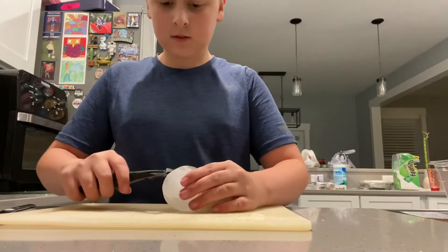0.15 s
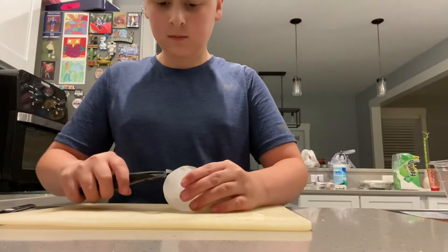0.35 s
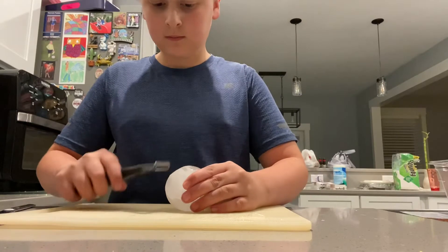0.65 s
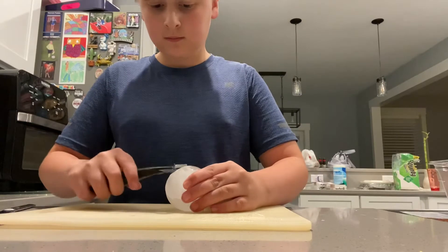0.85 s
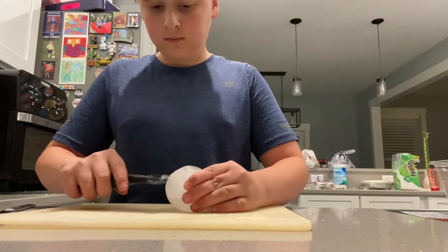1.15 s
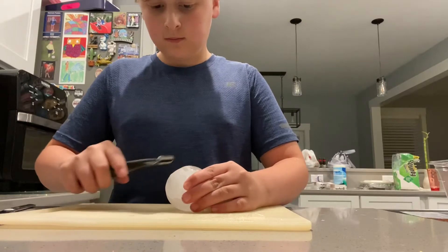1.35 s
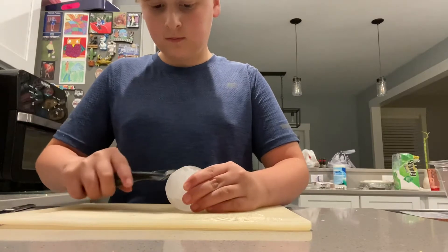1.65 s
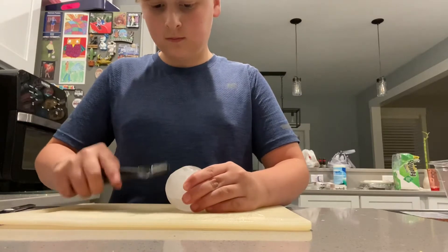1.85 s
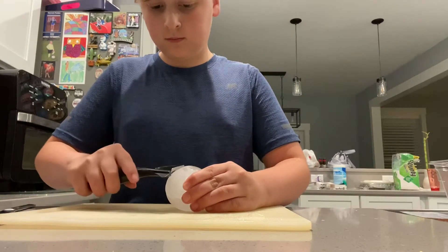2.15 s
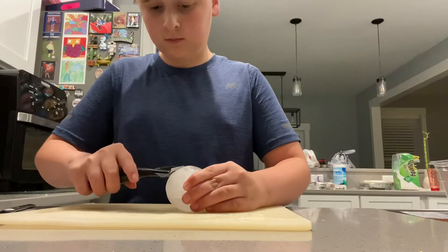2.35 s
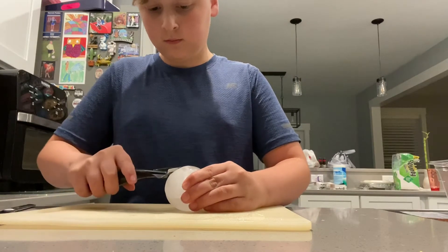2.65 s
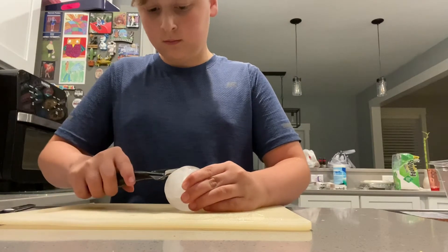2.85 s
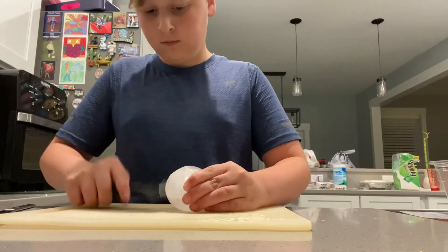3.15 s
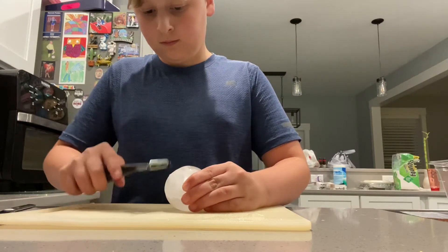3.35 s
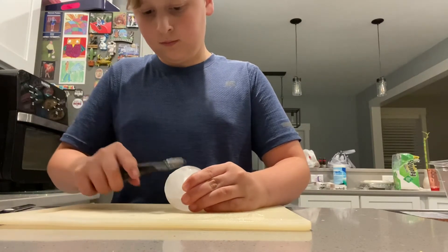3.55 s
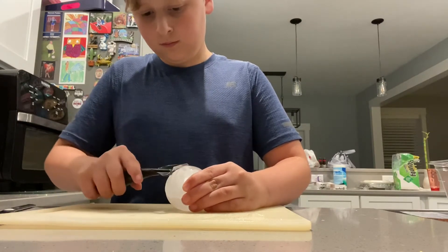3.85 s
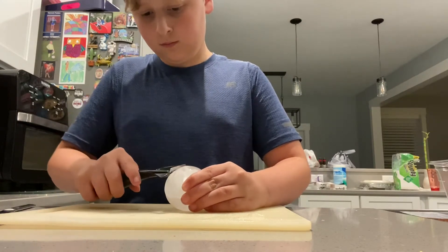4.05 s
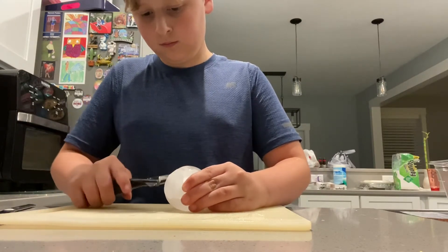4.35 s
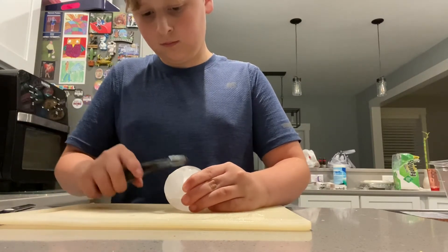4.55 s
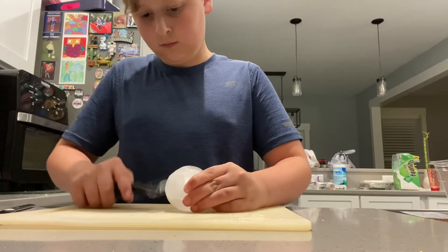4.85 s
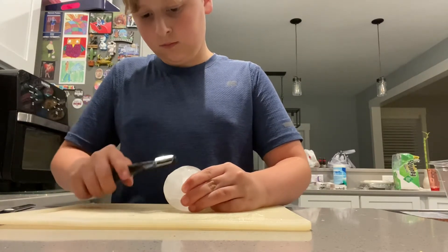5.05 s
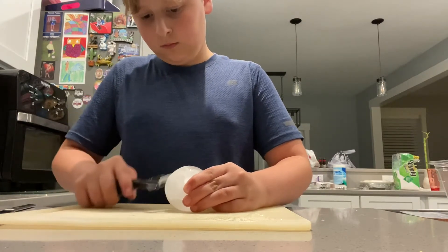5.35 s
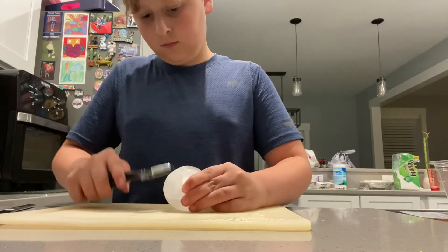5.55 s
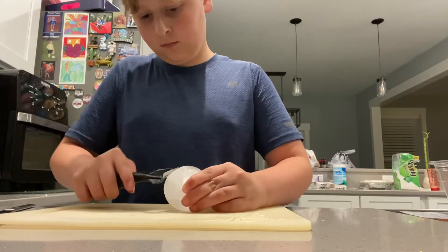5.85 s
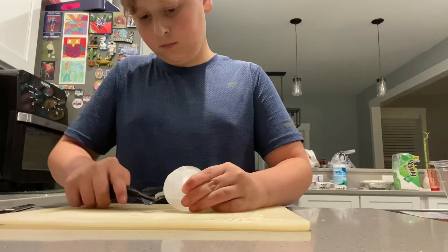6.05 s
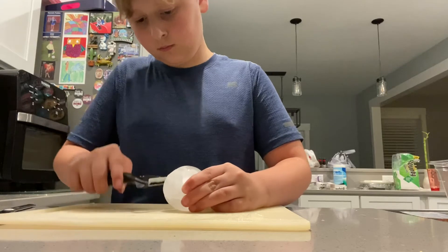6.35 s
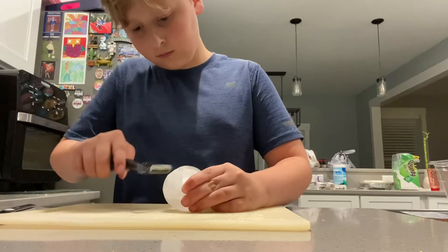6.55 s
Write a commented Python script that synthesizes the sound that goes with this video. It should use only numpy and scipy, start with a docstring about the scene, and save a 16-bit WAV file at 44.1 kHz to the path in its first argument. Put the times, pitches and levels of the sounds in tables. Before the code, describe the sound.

A steel peeler rasps in short, gritty strokes over a ball of ice, landing with sharp cracks and woody booms in a quiet kitchen.

```python
"""A quiet kitchen, close up on a phone's two microphone ports: a steel peeler shaves ice on a wooden board.
It opens with the blade already on the ice: fracture noise shakes the steel and the board booms under it.
Stroke follows stroke; the blade rattles, sings on one mode, and from the first second lands with a crack.
Knocks on the board follow, the heaviest just before six seconds, as the last stroke ends.
The room's decaying answer follows every sound; air noise, fuzzy tones and a low drone run throughout."""
import sys
import numpy as np
from scipy import signal
from scipy.fft import rfft, irfft, next_fast_len
from scipy.io import wavfile
from scipy.ndimage import uniform_filter1d, map_coordinates

SR = 44100
rng = np.random.default_rng(int(sys.argv[2]) if len(sys.argv) > 2 else 0)


def generate_wav(signal):
    """Clip the signal to [-1, 1] and save it as 16-bit WAV at the path in sys.argv[1]."""
    frames = np.transpose(np.atleast_2d(signal))
    scaled = np.clip(frames, -1, 1) * 32767
    pcm = np.round(scaled).astype(np.int16)
    wavfile.write(sys.argv[1], SR, pcm)


N = 295470  # samples

# the blade lands on the ice: (time [s], crack [dB], skid before it [s], skid [dB], board boom [dB],
# boom [Hz], low ring [dB], high ring [dB], settling [s]); the settling slope lasts half the last column
LANDINGS = [(0.823, -31, 0.016, -41.5, -17.5, 276, -46.5, -38, 0.21),
            (1.4552, -26, 0.013, -39.5, -17.5, 267, -40, -50, 0.21),
            (2.0106, -29, 0.01, -42, -15, 264, -46, -45.5, .24),
            (3.5586, -27.5, 0.013, -41, -22, 273, -51, -38.5, 0.65),
            (4.557, -21.5, 0.01, -39.5, -14, 282, -38, -24.5, 0.23),
            (5.132, -23.5, 0.0077, -39, -14.5, 278.5, -34, -34, 0.12),
            (5.6889, -33, 0.0075, -38.5, -18.5, 279, -51.5, -44, 0.48)]
# resonances of the steel peeler: (frequency [Hz], width [Hz], gain [dB])
PEELER = [(770, 4.3, -12.5), (1008, 74, -11), (1754, 68, -14), (2296, 28, -2.5), (2914, 110, -8),
          (3587, 55, -1.5), (4115, 210, -7.5), (4597, 38, -7), (4850, 33, -22), (6240, 1200, -13),
          (8000, 97, -26)]
# resonances of the wooden board: (frequency [Hz], width [Hz], gain [dB])
BOARD = [(154, 72.6, 1), (296.6, 42.6, 4), (479.8, 40.8, 0.5)]
# spectrum of a crack or clack: (frequency [Hz], level [dB per Hz])
CRACK = [(290, -30.5), (500, 3.5), (1450, 1), (3500, 0.5), (4220, -1.5), (5630, -1.5), (6690, 1.5),
         (9000, -7.5), (13000, -11), (15700, -32)]


def amp(db):
    """Decibels to linear gain."""
    return 10 ** (np.asarray(db) / 20)


def unit(x):
    """Scale to an RMS of one."""
    return x / np.sqrt(np.mean(x ** 2) + 1e-20)


def along(points, hz):
    """Interpolate (frequency, value) points on a log frequency axis."""
    f, v = np.transpose(points)
    return np.interp(np.log(hz + 1), np.log(f + 1), v)


def filtered(x, response):
    """Multiply the spectrum of x by a complex response of frequency."""
    m = next_fast_len(N + SR // 2)
    return irfft(rfft(x, m) * response(np.fft.rfftfreq(m, 1 / SR)), m)[..., :N]


def modes(table):
    """Causal response of (frequency, width, dB) resonances, with alternating polarity."""
    def response(f):
        total = 0
        for k, (centre, width, db) in enumerate(table):
            damping = 1j * f * width
            total = total + (-1) ** k * amp(db) * damping / (centre * centre - f * f + damping)
        return total
    return response


def colour(spectrum):
    """Zero-phase response of a smooth (frequency, dB) spectrum."""
    return lambda hz: amp(along(spectrum, hz))


def add(track, s, sound):
    """Mix a sound in at time s."""
    part = track[round(s * SR):][:len(sound)]
    part += sound[:len(part)]


def burst(db, t60, rise=.0001):
    """A puff of noise with a fast rise and an exponential decay."""
    t = np.arange(SR // 20) / SR
    return amp(db - 60 * t / t60) * (1 - np.exp(-t / rise)) * rng.standard_normal(len(t))


def push(db, length):
    """A soft raised-cosine shove."""
    return amp(db) * np.hanning(int(length * SR) + 3)


def wobble(rate):
    """A smooth random curve, rate knots a second."""
    return map_coordinates(rng.standard_normal(int(N * rate / SR) + 4), [np.arange(N) * rate / SR])


def contact():
    """Gains of rasp, treble, board and hollow body, all driven by the pressure of the blade."""
    # one curve per stroke or light touch, each a list of: (time [s], rasp level [dB])
    stroke_curves = [
        [(0.0, -55), (0.036, -54.5), (0.106, -60.5), (0.17, -71.5)],
        [(0.22, -90), (0.236, -74), (0.294, -75.5), (0.33, -67)],
        [(0.335, -64), (0.345, -54), (0.399, -50), (0.433, -47), (0.462, -66.5), (0.475, -55), (0.5, -59.5)],
        [(0.93, -69), (0.966, -49.5), (1.082, -50), (1.15, -55), (1.17, -89)],
        [(1.49, -59), (1.584, -45.5), (1.626, -52.5), (1.672, -42), (1.705, -59), (1.74, -60)],
        [(2.082, -69.5), (2.128, -49.5), (2.166, -59), (2.19, -75)],
        [(2.5, -78), (2.512, -76.5), (2.668, -80), (2.79, -71.5)],
        [(2.801, -45), (2.807, -53.5), (2.845, -41), (2.863, -55.5), (2.92, -63)],
        [(3.036, -52), (3.043, -46.5), (3.096, -42), (3.11, -49.5)],
        [(3.112, -52), (3.138, -40), (3.17, -54.5)],
        [(3.85, -87), (3.88, -77), (3.955, -85.5)],
        [(3.96, -80), (4.004, -57), (4.06, -45.5), (4.104, -51.5), (4.234, -45), (4.27, -72), (4.33, -59.5)],
        [(4.655, -58.5), (4.707, -47.5), (4.815, -38), (4.869, -59.5), (4.893, -54.5), (4.91, -53)],
        [(5.194, -64.5), (5.23, -49), (5.31, -42), (5.34, -38.5), (5.36, -56)],
        [(5.8, -70), (5.848, -43), (5.89, -40.5), (5.911, -39.5)],
        [(5.912, -30.5), (5.935, -38), (5.96, -46)],
    ]
    # colour of each stroke, same order, around its rasp: (treble [dB], board [dB], hollow body [dB])
    stroke_colours = [(-11.5, 0, -8), (-0.5, 6.5, 0.5), (-4.5, 3, -10), (-6, 1, -9.5), (-5.5, 1.5, -9),
                      (-6, -4, -8.5), (-5, 0.5, -4.5), (-3.5, 1, -3.5), (-3.5, 0, -2), (-3, 3.5, -5),
                      (3.5, 7.5, 2), (-5.5, 1, -4.5), (-5.5, 0.5, -5.5), (-6.5, -3, -9.5), (-2.5, -2, -4.5),
                      (0, 5.5, 6.5)]
    brighten_db = 2.5  # treble gain from start to end of a stroke
    firm_db = -53  # rasp level at which the board and body colours hold as listed
    board_follows, hollow_follows = 0.67, 0.68  # dB per dB of rasp
    # after a landing the blade settles: rasp under the crack's level [dB], delay [s], colour [dB]
    settle_db, settle_after_s, settle_colour = -28.5, 0.015, (-11.5, 3.9, -7)

    t, level = np.arange(N) / SR, np.zeros((4, N))
    contacts = list(zip(stroke_curves, stroke_colours))
    for s, crack_db, *_, settling_s in LANDINGS:
        start_s, start_db = s + settle_after_s, crack_db + settle_db
        curve = [(start_s, start_db), (start_s + settling_s / 2, start_db - 36.5)]
        contacts.append((curve, settle_colour))

    for curve, (treble_db, board_db, hollow_db) in contacts:
        s, db = np.transpose(curve)
        now = slice(max(int((s[0] - .01) * SR), 0), int((s[-1] + .01) * SR))
        edge_distance = np.minimum(t[now] - s[0], s[-1] - t[now])
        fade = np.clip(edge_distance / .004 + .5, 0, 1)
        rasp_db = np.interp(t[now], s, db)
        done = (t[now] - s[0]) / (s[-1] - s[0])
        over_firm = rasp_db - firm_db
        level[:, now] += fade * amp([rasp_db,
                                     rasp_db + treble_db + brighten_db * done,
                                     firm_db + board_db + board_follows * over_firm,
                                     firm_db + hollow_db + hollow_follows * over_firm])
    return level


def grit(rate, spread_db, share):
    """Ice fractures: tiny impulses of scattered size on a bed of noise."""
    chance, size, sign = rng.random(N), rng.exponential(size=N), rng.standard_normal(N)
    impulses = (chance < rate / SR) * sign * amp(spread_db * size)
    return unit(share * unit(impulses) + rng.standard_normal(N))


def patchy(x, depth_db):
    """The bite of the blade shifts: random gain patches in time and pitch."""
    z = signal.stft(x, nperseg=256)[2]
    field = uniform_filter1d(rng.standard_normal(z.shape), size=4, axis=0)
    field = uniform_filter1d(field, size=5, axis=1)
    return signal.istft(z * amp(depth_db * unit(field)), nperseg=256)[1][:N]


def strokes(level):
    """Ice grit shakes the peeler, split into three bands, and coarser grit shakes the board below."""
    # spectrum of the rasp ahead of the steel's resonances: (frequency [Hz], level [dB per Hz])
    rasp_spectrum = [(300, -46.5), (600, -21.5), (1000, -23.5), (1450, -15.5), (2300, -10), (3300, -5.5),
                     (4500, -26), (5500, -23), (6600, -51), (9000, -13.5), (13500, -26.5), (15700, -44)]
    crunch_per_s, crunch_db = 120, 1.6  # the edge digs in and breaks free

    below_treble = lambda hz: 1 / (1 + (hz / 5300) ** 10)
    below_rasp = lambda hz: 1 / (1 + (hz / 1420) ** 10)
    grains = grit(rate=3000, spread_db=2.5, share=.9) * amp(crunch_db * wobble(crunch_per_s))
    bite = patchy(grains, depth_db=3.0)
    rasp = filtered(bite, lambda hz: colour(rasp_spectrum)(hz) + 1.32 * modes(PEELER)(hz))
    hollow = unit(filtered(rasp, below_rasp))
    dull = unit(filtered(rasp, lambda hz: below_treble(hz) - below_rasp(hz)))
    bright = unit(filtered(rasp, lambda hz: 1 - below_treble(hz)))
    boom = unit(filtered(grit(rate=87, spread_db=0.0, share=0.49), modes(BOARD)))
    return (level * [dull, bright, boom, hollow]).sum(0)


def chatter(pressure):
    """Stick and slip lock on to one blade mode for a moment."""
    # the blade catches hard and sings: (middle [s], length [s], peak gain [dB])
    catches = [(0.418, 0.045, -56), (1.092, 0.022, -41.5), (1.649, 0.014, -42), (1.677, 0.033, -48),
               (3.08, 0.07, -41.5), (4.236, 0.066, -50.5), (4.72, 0.039, -49.5), (4.775, 0.03, -38),
               (4.803, 0.032, -35), (5.293, 0.068, -49), (5.324, 0.0084, -40.5), (5.884, 0.029, -36.5)]
    # the mode that chatters: (frequency [Hz], width [Hz], gain [dB])
    blade_mode = [(2945, 70, 0)]
    sing_db, sing_wavers_db = -12, 2.5  # lighter catches all along a stroke, relative to the rasp

    swell = pressure * amp(sing_db + sing_wavers_db * wobble(30))
    for middle, length, db in catches:
        add(swell, middle - length / 2, push(db, length))
    tone = filtered(rng.standard_normal(N), lambda hz: modes(blade_mode)(hz) ** 2)
    envelope = np.abs(signal.hilbert(tone))
    locked = tone / (envelope + 0.18 * tone.std())  # locking evens out the swing
    return swell * unit(locked)


def landings():
    """A short skid, a crack that rings the blade, then the board takes the weight and booms."""
    # blade modes that ring on after a landing: (frequency [Hz], t60 [s])
    ring_modes = [(4180, .13), (6650, .045)]
    steel, ringing, t = np.zeros(N), np.zeros(N), np.arange(SR // 8) / SR
    for s, crack_db, skid_s, skid_db, boom_db, boom_hz, *ring_db, _ in LANDINGS:
        run_in = np.linspace(.8, 1.2, int(skid_s * SR))
        add(steel, s - skid_s, amp(skid_db) * run_in * rng.standard_normal(len(run_in)))
        add(steel, s, burst(crack_db, t60=0.058))

        lowest = 0.68 * amp(-60 * t / 0.34) * np.sin(2 * np.pi * BOARD[0][0] * t)
        swing = np.sin(2 * np.pi * boom_hz * t) + lowest
        add(ringing, s + .003, amp(boom_db - 60 * t / 0.048) * (1 - np.exp(-t / 0.0085)) * swing)

        for (mode_hz, t60), level in zip(ring_modes, ring_db):
            wander = np.cumsum(rng.normal(0, 0.07, len(t)))  # the loose blade blurs its own pitch
            add(ringing, s, amp(level - 60 * t / t60) * np.sin(2 * np.pi * mode_hz * t + wander))
    crack = filtered(steel, lambda hz: colour(CRACK)(hz) * (0.82 + 0.27 * modes(PEELER)(hz)))
    return crack + ringing


def knocks():
    """Peeler and hand hit the board: a hard clack on wood, with a thud into the counter."""
    # hits, levels ahead of each filter: (time [s], wood [dB], clack [dB], thud [dB])
    hits = [(1.063, -38.5, -64, -30.5), (3.134, -5, -24, -15.5), (4.822, -5, -28.5, -41),
            (4.833, -20.5, -38, -18.5), (5.329, -26, -30.5, -39.5), (5.337, -6, -31, -16.5),
            (5.913, -0.3, -16, -4), (5.918, -6, -43.5, -26.5), (5.924, -10, -32.5, -8.5),
            (5.943, -3.5, -43, -14.5)]
    # resonances of the board surface: (frequency [Hz], width [Hz], gain [dB])
    surface = [(805, 25, 3), (1060, 160, 0.5), (1657, 1000, -5), (2450, 160, -6), (3600, 240, -19)]
    # resonances of the counter: (frequency [Hz], width [Hz], gain [dB])
    counter = [(60, 17, 3), (78, 59, -1.5), (115, 94, 3.5), (162.2, 190, -4.5), (309, 37, -19)]
    hard, clack, soft = np.zeros((3, N))
    for s, wood_db, clack_db, thud_db in hits:
        add(hard, s, burst(wood_db, t60=0.012, rise=0.0002))
        add(clack, s, burst(clack_db, t60=0.052))
        add(soft, s + 0.0024, push(thud_db, length=0.004))
    wood, thud = filtered(hard, modes(surface)), filtered(soft, modes(counter))
    return wood + filtered(clack, colour(CRACK)) + thud


def ticks(pressure):
    """The loose blade rattles and flakes snap: puffs around their own pitch, which also ring the peeler."""
    # rattles and larger snaps, ahead of their band filter: (time [s], level [dB], pitch [Hz])
    rattles = [(.029, -26, 5600), (.302, -44, 2690), (.473, -31.5, 7100), (0.48, -27.5, 5800),
               (1.117, -30.5, 7200), (1.142, -34.5, 6350), (1.579, -38, 6630), (1.584, -26, 1310),
               (1.717, -24.5, 4860), (1.883, -50.5, 3920), (2.15, -29.5, 4460), (2.703, -42, 2200),
               (2.837, -28, 8410), (2.894, -35, 3000), (3.117, -26.5, 7400), (3.151, -43, 7400),
               (3.238, -39, 5110), (3.523, -40, 1210), (3.796, -29, 1250), (3.881, -46, 2800),
               (4.313, -34.5, 5480), (4.386, -37, 1340), (4.664, -40, 5055), (4.7425, -21.5, 6610),
               (4.888, -31, 7200), (5.408, -37.5, 4900), (5.808, -32.5, 2470), (5.847, -33, 7810),
               (5.926, -33.5, 6420), (5.931, -12, 7990)]
    # small flakes snap at random: top level over the rasp, middle of a one-octave spread of pitch
    snaps_per_s, snap_db, snap_hz = 18, 7, 6500
    rebound_s, rebound_db = 0.0084, -12.5  # each tick rattles once more

    out, snaps = np.zeros(N), []
    for when, pitch, size in rng.random((int(snaps_per_s * N / SR), 3)):
        rasp_db = 20 * np.log10(pressure[int(when * N)] + 1e-9)
        snaps.append((when * N / SR, snap_db - 8 * size + rasp_db, snap_hz * 2 ** (pitch - .5)))

    for s, db, hz in rattles + snaps:
        edges = np.clip([hz / 1.78, hz * 1.33], 100, 15000)
        band = signal.butter(3, edges, "bandpass", fs=SR)
        add(out, s, signal.lfilter(*band, burst(db, t60=0.02, rise=0.0014)))
        rebound = burst(db + rebound_db, t60=0.023, rise=0.0029)
        add(out, s + rebound_s, signal.lfilter(*band, rebound))
    return out + 1.2 * filtered(out, modes(PEELER))


def room(x):
    """Each frequency of the kitchen's answer dies at its own speed, through noise tails renewed in turn."""
    # decay of the kitchen: (frequency [Hz], t60 [s])
    decay = [(100, 0.55), (500, 0.64), (1200, 0.69), (4000, 0.48), (9000, 0.37)]
    out, step = np.zeros((2, N + 2 * SR)), SR // 4
    for start in range(0, N, step):
        hz, t, z = signal.stft(rng.standard_normal((2, SR // 2)), SR, nperseg=256)
        dying = amp(-60 * t / along(decay, hz)[:, None])
        tail = signal.istft(z * dying, SR, nperseg=256)[1]
        tail = tail / np.linalg.norm(tail[0])
        wet = signal.fftconvolve(x[None, start:start + step], tail, axes=1)
        out[:, start + 200:start + 200 + wet.shape[1]] += wet  # 200 samples late
    return out[:, :N]


def air():
    """Room air and appliances: noise whose likeness at the two ports varies with pitch, and a low drone."""
    # spectrum of the room air: (frequency [Hz], level [dB per Hz])
    air_spectrum = [(36, -23), (62, -3.5), (76, -10.5), (119, -17.5), (184, -14.5), (227, -12.5),
                    (321, -16.5), (352, -27), (475, -19.5), (534, -28.5), (599, -24), (909, -32),
                    (1330, -40.5), (3000, -50), (5300, -59.5), (6970, -58), (8380, -56.5), (15700, -59.5)]
    # fuzzy appliance tones, levels ahead of the ports: (frequency [Hz], width [Hz], level [dB])
    fuzzy_tones = [(183, 14, -69), (8510, 45, -91)]
    # how alike the two ports hear the noise: (frequency [Hz], left-right correlation [-1 to 1])
    likeness = [(60, 0.9), (240, 0.78), (950, 0.04), (3770, 0.04), (15000, 0.5)]
    # a compressor drones: (frequency [Hz], level [dB])
    motor_hz, motor_db = (51, -52)
    air_db = -58

    def pair(gain):
        """Noise as middle and side signals, balanced for the likeness."""
        turn = lambda hz: np.arccos(np.clip(along(likeness, hz), -1, 1)) / 2
        balance = lambda hz: gain(hz) * np.array([np.cos(turn(hz)), np.sin(turn(hz))])
        return filtered(rng.standard_normal((2, N)), balance)

    both = amp(air_db + 0.5 + 0.54 * wobble(6.5)) * unit(pair(colour(air_spectrum)))
    for hz, width, db in fuzzy_tones:
        both += amp(db) * unit(pair(lambda f: np.exp(-((f - hz) / width) ** 2)))
    turns = np.cumsum(motor_hz + 2.5 * wobble(8)) / SR
    drone = amp(motor_db + 0.81 * wobble(5)) * np.sin(2 * np.pi * turns)
    middle, side = both
    return np.array([middle + side, middle - side]) + drone * amp([[.7], [-.7]])


def ports(x):
    """The phone's body shades and delays each port differently."""
    # level difference: (frequency [Hz], left minus right [dB])
    lean = [(60, 2), (170, 1), (260, -5), (500, -1.5), (1000, 1.5), (2400, 4), (4400, 0), (6400, -4),
            (8000, 0), (15000, 0)]
    # phase difference: (frequency [Hz], lead of the left port [rad])
    lead = [(60, -.1), (200, -.5), (290, .4), (550, 1.5), (1000, .7), (1300, 2.2), (1900, 1.2), (2400, -.6),
            (2950, .8), (3300, 1.9), (4200, -.2), (5000, -1.3), (5600, -2.4), (6500, -1.5), (8000, -.4),
            (9800, 3.05), (11100, 3.25), (12400, 6.1), (13600, 6.5), (14700, 9.3), (15800, 9.5)]
    sign = np.array([[.5], [-.5]])  # half the difference to each port
    return filtered(x[None], lambda hz: amp(sign * along(lean, hz)) * np.exp(1j * sign * along(lead, hz)))


def scene():
    """Peeler, ice and board close to the ports, with the kitchen's answer and air behind."""
    level = contact()
    pressure = level[0]
    near = strokes(level) + chatter(pressure) + landings() + knocks() + ticks(pressure)
    far = amp(-8.5) * room(near) + air()
    treble = lambda hz: .85 / (1 + (8000 / (hz + 1)) ** 8)  # high sounds reach both ports by one path
    one_path = amp(3.5) * near + filtered(far[0], treble)
    return ports(one_path) + filtered(far, lambda hz: 1 - treble(hz))


def record(dry):
    """The tallest peaks are rounded off; the sound is coloured and the treble dips near 10 kHz; deep bass is
    cut, and the sound stops at the phone's band limit."""
    # colour of the sound, with a treble dip near 10 kHz: (frequency [Hz], gain [dB])
    shading = [(100, 0), (1100, 0), (1450, -5), (2000, 0), (8800, 0), (9800, -7), (11000, -7), (12300, 0),
               (13500, -2), (15000, 1)]
    top_hz = 15816
    rounded = dry / (1 + np.abs(dry / .45) ** 4) ** .25
    bass_cut = lambda hz: (1j * hz / (40 + 1j * hz)) ** 3
    return filtered(rounded, lambda hz: (hz < top_hz) * colour(shading)(hz) * bass_cut(hz))


dry = scene()
out = record(dry)
generate_wav(out)
```